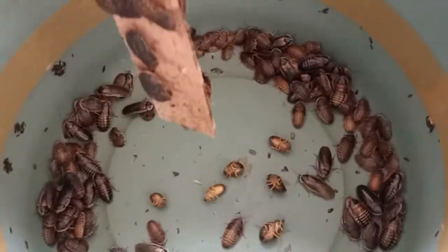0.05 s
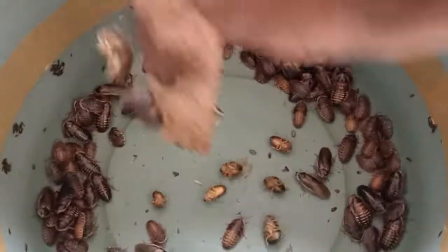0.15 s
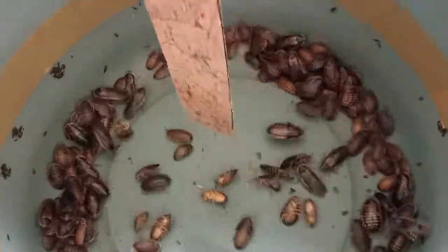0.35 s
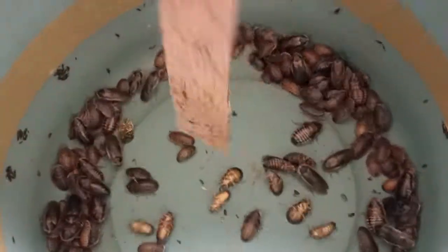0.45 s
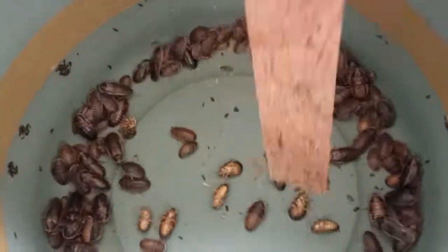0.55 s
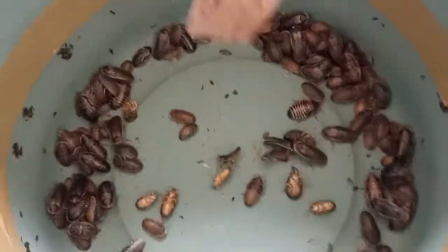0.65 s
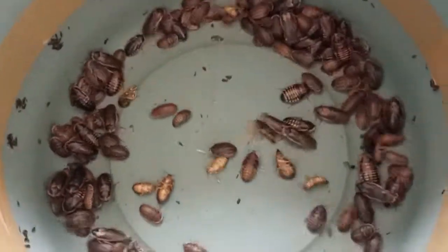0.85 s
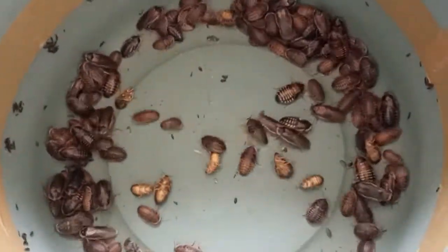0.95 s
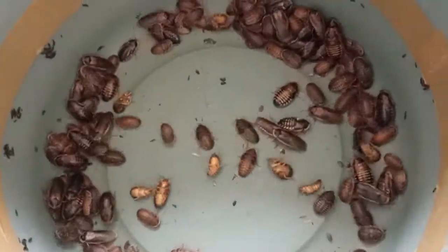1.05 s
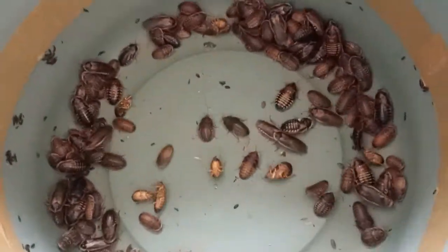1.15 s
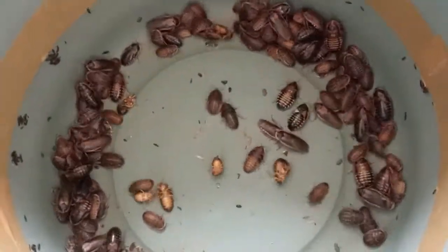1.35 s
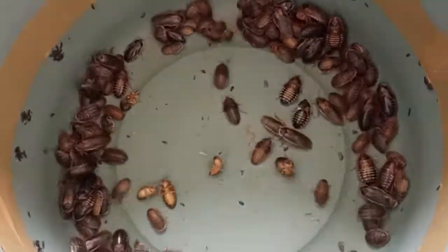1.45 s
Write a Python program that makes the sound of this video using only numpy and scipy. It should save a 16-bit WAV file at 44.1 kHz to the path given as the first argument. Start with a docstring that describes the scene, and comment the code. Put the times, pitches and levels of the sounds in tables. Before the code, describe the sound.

Hollow knocks of cardboard against a plastic tub come in a brief, loud cluster, led by a squeaking scrape. Afterwards, falling insects tick on the bottom and many legs patter softly over a faint hiss in a small room.

```python
"""In a small room, a colony of insects rustles in a plastic tub over a faint steady hiss.
A cardboard strip scrapes and squeaks on the tub by stick-slip friction, then knocks on it to shake
insects off: the cardboard crunches, and each impact excites the booming bottom and ringing wall.
Insects then drop onto the bottom with small ticks, among flurries of legs and two faint squeaks,
while the colony keeps rustling and pattering on the plastic."""
import sys
import numpy as np
from scipy import signal
from scipy.fft import rfft, irfft
from scipy.io import wavfile

SR = 44100
rng = np.random.default_rng(int(sys.argv[2]) if len(sys.argv) > 2 else 0)


def wrap_up_sound(samples):
    """Save the sound to the file named by the first command line argument, as 16-bit audio."""
    columns = np.atleast_2d(samples).T
    # keep every value between -1 and 1, then stretch to whole-number steps
    tamed = np.clip(columns, -1, 1)
    steps = np.round(tamed * 32767).astype(np.int16)
    wavfile.write(sys.argv[1], SR, steps)


N = 66150
T = np.arange(N) / SR
HZ = np.fft.rfftfreq(N, 1 / SR)

# Knocks of the strip on the tub: start_s, boom_db, ring_db, crunch_db, snap_db
KNOCK_EVENTS = [(0.2296, -10, -10.5, -20, -25), (0.2345, -16.5, -31, -25, -33),
                (.2400, -26, -13.5, -21.5, -41), (.2460, -11.5, -16, -24.5, -48),
                (0.2566, -23.5, -30, -17.5, -29), (.2578, -29, -4, -24.5, -35),
                (0.263, -13.5, -33, -19.5, -45), (0.2728, -20.5, -17, -20, -26),
                (0.28, -17.5, -17, -16.5, -26), (0.2873, -26, -15.5, -26, -43),
                (0.2998, -38, -15.5, -24, -36), (.3235, -57, -13, -16, -26.5), (0.3277, -12, -18, -30, -50),
                (.3670, -40, -35, -50, -58), (0.436, -33, -32.5, -36.5, -62)]
# Normal modes of the tub's bottom and wall: pitch_hz, level_db, t60_s
BOTTOM_MODES = [(210.3, -18, 0.57), (238.7, -1, 0.064), (319.5, -1, 0.038), (344.7, -11.5, 0.086)]
WALL_MODES = [(481.4, -22, 0.079), (552.6, -20.5, 0.12), (609.5, -6, 0.039), (665.3, -7, 0.078),
              (695, -14.5, .3), (735.8, -3.5, 0.052), (860, -14, 0.054), (1089.7, -14, 0.076),
              (1520, -22.5, 0.086), (2014, -15.5, 0.046)]
CONTACT_S, WALL_SPREAD_RAD = 0.00051, 0.05


def amp(db):
    """Decibels to amplitude ratio."""
    return 10 ** (np.asarray(db) / 20)


def unit(x):
    """Normalisation to rms 1."""
    return x / np.sqrt(np.mean(x ** 2) + 1e-20)


def curve_at(points, hz):
    """Interpolation on a log-frequency axis."""
    knots_hz, values = np.transpose(points)
    return np.interp(np.log(hz + 1), np.log(knots_hz + 1), values)


def convolve(x, response):
    """A linear system's output: convolution with its impulse response, cut to the scene's length."""
    return signal.fftconvolve(np.atleast_2d(x), np.atleast_2d(response), axes=1)[:, :N]


def colour(pair, spectrum):
    """Spectral shaping of two independent noises, mixed to be most coherent in the bass."""
    # Likeness of left and right: frequency_hz, coherence
    likeness = [(60, 0.81), (300, 0.81), (700, 0.45), (1400, 0.17), (15000, 0.2)]
    coherence = np.clip(curve_at(likeness, HZ), -1, 1)
    left, independent = rfft(pair)
    right = coherence * left + np.sqrt(1 - coherence ** 2) * independent
    return irfft(np.array([left, right]) * unit(amp(curve_at(spectrum, HZ))), N)


def pan(pair, balance, left_lag_s=0.00013):
    """Level and time differences: each frequency leans to one side, and the left arrives later."""
    side_db = curve_at(balance, HZ) / 2
    delay = np.exp(-2j * np.pi * HZ * left_lag_s * np.array([[.5], [-.5]]))
    return irfft(rfft(pair) * amp([side_db, -side_db]) * delay, N)


def grains(per_s, spread_db):
    """Shot noise: two random trains of clicks of uneven size."""
    size = amp(spread_db * np.minimum(rng.exponential(1, (2, N)), 4))
    polarity = rng.choice([-1, 1], (2, N))
    occurs = rng.random((2, N)) < per_s / SR
    return unit(size * polarity * occurs)


def swells(rows):
    """Envelopes with a Gaussian rise and an exponential decay, added in power."""
    power = np.zeros(N)
    for peak_s, rise_s, fall_s, level_db in rows:
        age = T - peak_s
        shape = np.exp(np.where(age < 0, -.5 * (age / rise_s) ** 2, -age / fall_s))
        power += (amp(level_db) * shape) ** 2
    return np.sqrt(power)


def impulses(rows, column):
    """Impulsive excitation: one impulse per row, at the level in the chosen column."""
    out = np.zeros(N)
    for row in rows:
        out[round(row[0] * SR)] += amp(row[column])
    return out


def ring(modes, rise_s, spread_rad=0):
    """Modal superposition: damped sines of alternating sign, set apart in phase left and right."""
    out = np.zeros((2, N))
    for k, (pitch_hz, level_db, t60_s) in enumerate(modes):
        offset = spread_rad * pitch_hz / modes[0][0] * np.array([[-.5], [.5]])
        out += (-1) ** k * amp(level_db - 60 * T / t60_s) * np.sin(2 * np.pi * pitch_hz * T + offset)
    return out * (1 - np.exp(-T / rise_s))


def strike(rows):
    """Impulse response of the tub: each blow sets the bottom booming and the wall ringing."""
    boom = convolve(impulses(rows, 1), ring(BOTTOM_MODES, CONTACT_S))
    wall = convolve(impulses(rows, 2), ring(WALL_MODES, CONTACT_S, WALL_SPREAD_RAD))
    return boom + wall


def hiss():
    """Stationary Gaussian noise, heard as a faint steady hiss."""
    # Spectral density of the hiss: frequency_hz, relative_db
    spectrum = [(25, -24), (50, -10), (70, -2.5), (130, 9), (250, 1), (400, -1), (700, -9), (1500, -2),
                (3000, -10), (5000, -9), (8000, -10.5), (11400, -9), (12000, -6), (16000, -11)]
    # Its stereo balance: frequency_hz, left_minus_right_db
    balance = [(100, 0), (1200, 3.5), (3300, 2), (6000, 8.5), (9000, -1), (15000, -7.5)]
    return pan(amp(-53.5) * colour(rng.standard_normal((2, N)), spectrum), balance)


def room(x, build_up_s=0.002):
    """Reverberation: a diffuse tail in which each band decays exponentially at its own rate."""
    # Reverberation time: frequency_hz, t60_s
    decay_times = [(100, 1), (230, 0.51), (400, 0.77), (700, 0.51), (2500, 0.5), (6000, .5), (14000, 0.45)]
    # Strength of the reverberation: frequency_hz, level_db
    levels = [(100, -16.5), (230, -12.5), (400, -5), (700, -11.5), (1200, -2), (2200, -6), (6000, -5),
              (13000, -7.5)]
    white = colour(rng.standard_normal((2, N)), [(20, 0), (20000, 0)])
    hz, t, bands = signal.stft(white, SR, nperseg=512)
    fade = amp(-60 * t / curve_at(decay_times, hz)[:, None])
    energy = N * np.mean(fade ** 2, axis=1, keepdims=True)
    gain = amp(curve_at(levels, hz))[:, None] / np.sqrt(energy)
    tail = signal.istft(bands * fade * gain, SR, nperseg=512)[1][:, :N]
    return convolve(x, tail * (1 - np.exp(-(T / build_up_s) ** 2)))


def colony(startle_s=0.16):
    """Friction of legs and shells makes a rustle; random footsteps drive the tub's modes."""
    # Spectral density of the rustle: frequency_hz, relative_db
    spectrum = [(200, -24), (1000, -7), (1700, -4.5), (2500, 2), (3400, 1), (4500, -7), (6500, -10),
                (10000, -18), (16000, -10.5)]
    # Flurries of legs: peak_s, rise_s, fall_s, level_db
    flurries = [(.637, 0.0043, 0.011, -46), (.715, 0.022, 0.026, -52), (.842, 0.0036, 0.0073, -44.5),
                (1.155, 0.0077, 0.021, -44)]
    activity = np.hypot(amp(-54.5), swells(flurries))
    rustle = colour(grains(per_s=5000, spread_db=2) * activity, spectrum)
    steps = grains(per_s=240, spread_db=2)[0]
    boom = amp(-64) * unit(convolve(steps, ring(BOTTOM_MODES, CONTACT_S)))
    wall = amp(-57.5) * unit(convolve(steps, ring(WALL_MODES, CONTACT_S, WALL_SPREAD_RAD)))
    calm = amp(-2 * (T < startle_s))  # quieter until the strip startles the insects
    return (rustle + boom + wall) * calm


def falling_insects():
    """Light impacts: each landing excites a heavily damped tick and rings the tub faintly."""
    # Landings on the bottom: start_s, boom_db, ring_db, tick_db
    landings = [(.610, -42, -37, -49), (.660, -49, -40, -51), (.725, -45, -37, -53),
                (.7558, -43, -35.5, -35.5), (.858, -56, -41, -50), (.876, -54, -43, -48),
                (1.115, -52, -45.5, -59), (1.191, -62, -40, -55), (1.458, -56, -46, -42)]
    # Modes of a shell on plastic: pitch_hz, level_db, t60_s
    shell_modes = [(703, -1, 0.027), (1100, -4, 0.012)]
    return strike(landings) + convolve(impulses(landings, 3), ring(shell_modes, rise_s=0.00041))


def squeaks(sag_per_s=0.91):
    """Friction excites narrow resonances: a fuzzy whistle that sags as the rubbing slows."""
    # Rubs on the plastic: peak_s, rise_s, fall_s, level_db
    rubs = [(.169, 0.0047, 0.014, -36.5), (0.203, 0.011, 0.029, -41), (1.03, .02, 0.029, -67),
            (1.385, 0.024, 0.021, -58)]
    # Resonances at the peak of a rub: pitch_hz, width_hz, level_db
    resonances = [(3032, 210, 1), (3385, 140, -5.5), (7920, 360, -4)]
    out = np.zeros((2, N))
    for rub in rubs:
        pitch_ratio = 1 - sag_per_s * (T - rub[0])
        warped_s = np.cumsum(pitch_ratio) / SR
        for pitch_hz, width_hz, level_db in resonances:
            lowpass = signal.butter(2, width_hz / 2, fs=SR, output="sos")
            in_phase, quadrature = signal.sosfilt(lowpass, rng.standard_normal((2, 2, N)))
            whistle = (in_phase + 1j * quadrature) * np.exp(2j * np.pi * pitch_hz * warped_s)
            out += amp(level_db) * swells([rub]) * unit(whistle.real)
    return out


def scrape():
    """Stick-slip friction: dense slips of the dry strip, filtered by its own resonances."""
    # Strokes of the strip: peak_s, rise_s, fall_s, level_db
    strokes = [(.167, 0.0092, 0.025, -29.5), (.207, 0.0049, 0.031, -34)]
    # Spectral density of the scrape: frequency_hz, relative_db
    spectrum = [(60, -42), (130, -4), (300, -6), (700, -3.5), (1200, -5.5), (2400, -1), (3200, 2.5),
                (3700, -3), (5500, -7), (9000, -5.5), (12000, -1.5), (16000, -3.5)]
    return colour(grains(per_s=9900, spread_db=1) * swells(strokes), spectrum)


def bursts(column, decay_s, rise_s=0.0012, rattle_s=0.014):
    """Shot noise with a two-stage decay: a burst at each knock, then a weaker rattle."""
    power = np.zeros(N)
    for knock in KNOCK_EVENTS:
        age = np.maximum(T - knock[0], 0)
        decay = np.exp(-age / decay_s) + amp(-18.5) * np.exp(-age / rattle_s)
        shape = (1 - np.exp(-age / rise_s)) * decay
        power += (amp(knock[column]) * shape / shape.max()) ** 2
    return grains(per_s=18000, spread_db=3) * np.sqrt(power)


def cardboard_cracks():
    """Impact noise: the cardboard crunches at each knock and its edge snaps, nearer the right."""
    # Spectral densities of the woody crunch and the bright snap: frequency_hz, relative_db
    crunch_spectrum = [(40, -55), (150, -9), (400, 5), (900, 4), (1400, 0), (2000, 2), (3100, -0.5),
                       (4200, -7.5), (6000, -10.5), (9000, -21.5), (12500, -24), (16000, -27)]
    snap_spectrum = [(100, -40), (3000, -28), (7000, -16.5), (10000, -5), (12500, 0), (16000, -5)]
    crunch = colour(bursts(column=3, decay_s=0.0053), crunch_spectrum)
    snap = colour(bursts(column=4, decay_s=0.0031), snap_spectrum)
    return crunch + snap * amp([[-1], [1]])


def tub_knocks():
    """Free vibration: knocks set the bottom booming and the wall ringing; pushes add a low hum."""
    # Pushes of the strip: start_s, level_db
    pushes = [(.240, -22.5), (.276, -24), (.320, -39)]
    # Lowest modes of the whole tub: pitch_hz, level_db, t60_s
    flex_modes = [(90, -15.5, 0.38), (112.2, -7, 0.33), (145.5, -2, 0.28), (178.8, -7, 0.34)]
    return strike(KNOCK_EVENTS) + convolve(impulses(pushes, 1), ring(flex_modes, rise_s=0.0015))


def scene():
    """Superposition of the direct sound of strip, tub and insects, its reverberation and the hiss."""
    # Stereo balance of the sources and the room: frequency_hz, left_minus_right_db
    balance = [(100, 0.5), (700, 0), (1300, -1.5), (3300, 5.5), (6000, 1), (9000, 3.5), (12000, -15.5),
               (16000, 4)]
    direct = tub_knocks() + cardboard_cracks() + scrape() + squeaks() + falling_insects() + colony()
    return hiss() + pan(direct + room(direct), balance)


def record(dry, low_hz=60, high_hz=16000):
    """Band limiting: steep filters remove the deep bass and the highest treble."""
    highpass = signal.butter(6, low_hz, "highpass", fs=SR, output="sos")
    lowpass = signal.firwin(511, high_hz, window=("kaiser", 9), fs=SR)
    return signal.oaconvolve(signal.sosfilt(highpass, dry), lowpass[None], "same")


dry = scene()
out = record(dry)
wrap_up_sound(out)
```